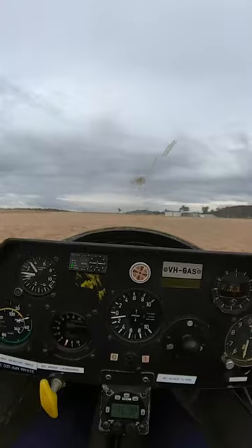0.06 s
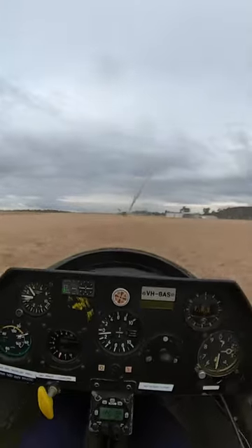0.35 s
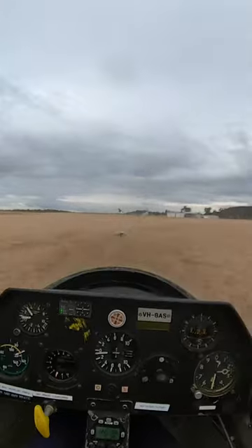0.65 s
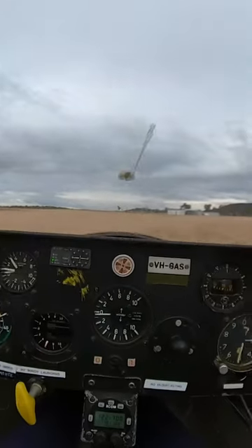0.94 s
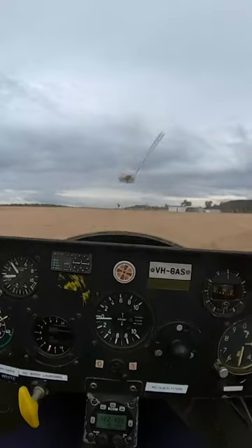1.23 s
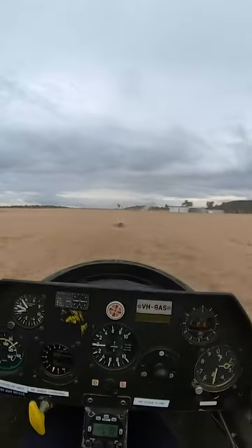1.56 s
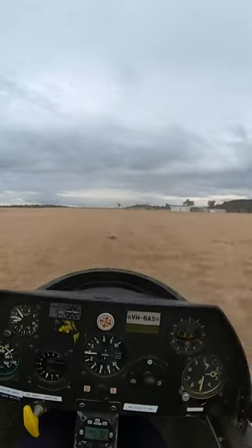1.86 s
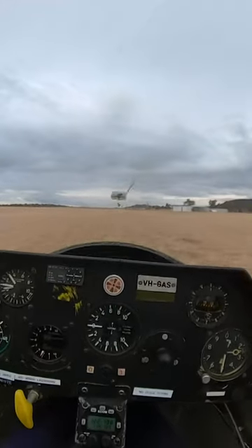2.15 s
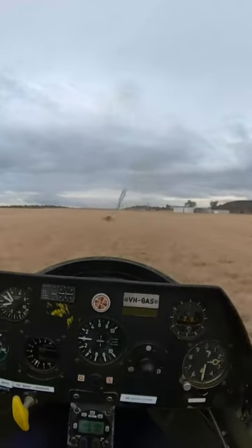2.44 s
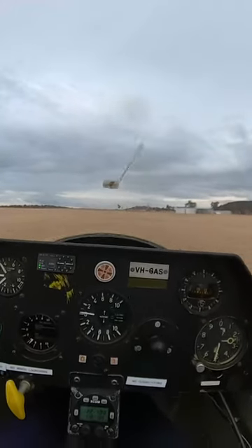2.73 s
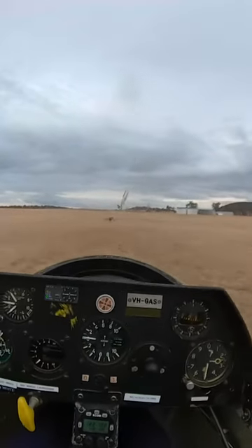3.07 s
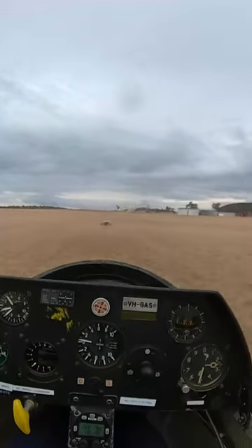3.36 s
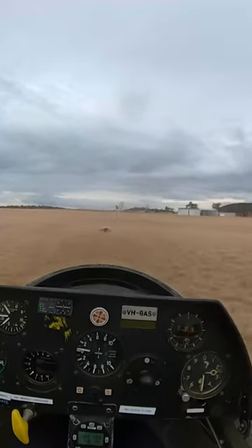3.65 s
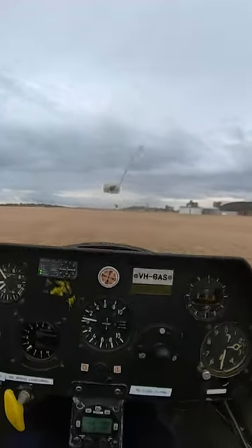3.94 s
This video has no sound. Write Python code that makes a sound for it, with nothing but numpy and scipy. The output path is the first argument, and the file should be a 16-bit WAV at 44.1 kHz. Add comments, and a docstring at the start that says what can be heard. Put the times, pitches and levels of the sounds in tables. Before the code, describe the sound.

The deep rumble of a glider's wheel on bumpy grass, heard from the pilot's seat, booms and drums through the fuselage. Scattered thuds, small rattles and thin metal chirps sound throughout, over scraping grass and a faint, even wind.

```python
"""Glider rolling over rough grass

Heard inside the closed cockpit, at speed. The wheel keeps the hollow fuselage booming,
drums on the shell and thuds over bumps; dry grass scrapes underneath.
Loose fittings rattle, knock and chirp, and air rushes past the canopy."""
import sys
import numpy as np
from scipy import signal
from scipy.fft import rfft, irfft, next_fast_len
from scipy.io import wavfile
from scipy.ndimage import uniform_filter1d, minimum_filter1d, map_coordinates

SR = 44100
rng = np.random.default_rng(int(sys.argv[2]) if len(sys.argv) > 2 else 0)


def pcm_store(signal):
    """Save signal as 16-bit PCM."""
    levels = np.round(np.clip(np.atleast_2d(signal), -1, 1) * 32767)
    wavfile.write(sys.argv[1], SR, levels.astype(np.int16).T)


N = 176400


def amp(db):
    """Decibels to gain."""
    return 10 ** (np.asarray(db) / 20)


def unit(x):
    """x at rms 1."""
    return x / np.sqrt(np.mean(x ** 2) + 1e-20)


def time_s():
    """Time of each sample."""
    return np.arange(N) / SR


def along(points, hz):
    """Interpolate (frequency [Hz], value) points on a log axis."""
    knots_hz, values = np.transpose(points)
    return np.interp(np.log(hz + 1), np.log(knots_hz + 1), values)


def curve(rows):
    """Interpolate (time [s], value) rows to one value per sample."""
    return np.interp(time_s(), *np.transpose(rows))


def wobble(rate_hz):
    """Smooth random curve through Gaussian knots."""
    knots = rng.standard_normal(int(N * rate_hz / SR) + 4)
    return map_coordinates(knots, [time_s() * rate_hz])


def filtered(x, response):
    """Apply a frequency response to x."""
    size = next_fast_len(N + SR // 2)
    return irfft(rfft(x, size) * response(np.fft.rfftfreq(size, 1 / SR)), size)[:N]


def noise(spectrum):
    """Coloured noise, rms 1."""
    return unit(filtered(rng.standard_normal(N), lambda hz: amp(along(spectrum, hz))))


def resonance(x, hz, width_hz):
    """x through two equal band-passes, each width_hz wide; rms 1."""
    return unit(filtered(x, lambda f: (1j * f * width_hz / (hz * hz - f * f + 1j * f * width_hz)) ** 2))


def steadied(x, evenness):
    """Partly flatten the envelope of x; rms 1."""
    envelope = np.abs(signal.hilbert(x))
    return unit(x / (envelope + 0.072) ** evenness)


def swells(rows, attack_s, release_s):
    """Summed attack-hold-release envelopes from (time [s], level [dB], length [s]) rows."""
    t = time_s()
    envelope = np.zeros(N)
    for start_s, db, length_s in rows:
        attack = np.clip((t - start_s) / attack_s, 0, 1)
        release = np.exp(-np.maximum(t - start_s - length_s, 0) / release_s)
        envelope += amp(db) * attack * release
    return envelope


def patchy(x, depth_db):
    """Short patches of random gain over frequency and time; rms 1."""
    bins = signal.stft(x, nperseg=256)[2]
    field = uniform_filter1d(rng.standard_normal(bins.shape), size=5, axis=0)
    field = unit(uniform_filter1d(field, size=7, axis=1))
    return unit(signal.istft(bins * amp(depth_db * field), nperseg=256)[1][:N])


def fuselage():
    """The cabin's lowest mode booms as the wheel shakes it."""
    # shaking of the fuselage (time [s], level [dB])
    shake = [(0.01, -28.5), (0.15, -15), (0.9, -20.5), (0.955, -11), (1.03, -12.5), (1.08, -30.5),
             (1.33, -10.5), (1.47, -23.5), (1.94, -17.5), (2.33, -24.5), (2.4, -15.5), (3.06, -18),
             (3.1, -26), (3.21, -26), (3.27, -2.5), (3.3, -25), (3.93, -11.5), (3.99, -41.5)]
    boom = resonance(rng.standard_normal(N), hz=64.2, width_hz=19.7)
    return amp(curve(shake)) * steadied(boom, evenness=0.39)


def bumps():
    """The airframe heaves all along; each bump adds a thud and a stronger heave."""
    # wheel impacts (time [s], thud level [dB], length [s], heave level [dB])
    impacts = [(0.119, -17.5, 0.025, -27), (0.508, -17.5, 0.026, -22), (0.882, -14.5, 0.04, -25.5),
               (0.931, -14, .026, -27), (1.664, -20, .11, -21), (3.221, -15.5, 0.017, -25),
               (3.323, -17, 0.021, -37.5), (3.424, -19, 0.046, -16)]
    # impact noise (frequency [Hz], density [dB])
    thud_spectrum = [(50, -25.5), (100, -5), (140, 4), (190, -6), (400, -18), (800, -25), (2000, -47),
                     (8000, -70.5)]
    # airframe motion (frequency [Hz], density [dB])
    heave_spectrum = [(10, -32), (19, -25), (27, 0.5), (36, 8.5), (50, 10.5), (70, -9.5), (250, -110)]
    thud_gain = swells([(s, db, hold) for s, db, hold, _ in impacts], attack_s=0.0087, release_s=0.034)
    heave_gain = swells([(s, db, hold) for s, _, hold, db in impacts], attack_s=0.0067, release_s=0.08)
    thud = steadied(noise(thud_spectrum), evenness=0.64)
    heave = steadied(noise(heave_spectrum), evenness=0.54)
    return thud_gain * thud + np.hypot(heave_gain, amp(-24)) * heave


def wheel():
    """Clods jolt the wheel: rumble, with drumming, panel groans and grass noise."""
    # ground roughness (time [s], level [dB])
    roughness = [(0.09, -57.5), (0.118, -51), (0.135, -42), (0.17, -43.5), (0.24, -44.5), (0.39, -52),
                 (0.53, -42), (0.72, -49.5), (0.76, -57), (0.8, -45.5), (0.97, -41), (1.02, -49.5),
                 (1.13, -54), (1.17, -43.5), (1.55, -48), (1.65, -40.5), (1.69, -44), (1.87, -42.5),
                 (2.03, -51), (2.05, -44), (2.4, -44), (3.17, -47.5), (3.235, -41), (3.28, -43.5),
                 (3.41, -46.5), (3.45, -35.5), (3.48, -45.5), (3.58, -47.5), (3.62, -45), (3.86, -41),
                 (3.97, -45)]
    # wheel rumble (time [s], level [dB])
    rumble_levels = [(0, -28), (.18, -27), (.35, -32), (.55, -22.5), (.68, -32), (1.0, -21.5),
                     (1.13, -26.5), (1.58, -26), (1.76, -21.5), (1.92, -24.5), (2.13, -21), (2.6, -25.5),
                     (3.3, -29.5), (3.95, -24)]
    # wheel rumble (frequency [Hz], density [dB])
    rumble_spectrum = [(60, -38.5), (85, -8), (108, -4.5), (137, 2), (175, -8), (300, -14.5), (500, -27.5),
                       (2000, -100)]
    ground_db = curve(roughness)
    jolts = unit(amp(1.07 * wobble(45) + 1.37 * wobble(170)))
    rumble = amp(curve(rumble_levels)) * jolts * noise(rumble_spectrum)
    return rumble + drumming(ground_db, jolts) + panel() + grass(ground_db, jolts)


def drumming(ground_db, jolts):
    """Jolts drum on the shell and ring its modes, louder on rougher ground."""
    # shell modes (frequency [Hz], half width [Hz], level [dB])
    modes = [(263, 27, -10.5), (366.4, 40, -6.5), (520.3, 14, -6.5), (553, 21, -14.5), (762, 49, -10.5),
             (863.2, 15, -13.5), (1177, 40, -25.5)]
    # broadband drumming (frequency [Hz], density [dB])
    drum_spectrum = [(80, -9), (310, -1), (830, -2.5), (1000, -10.5), (1400, -14.5), (1900, -20),
                     (3000, -38.5), (9000, -65)]
    shell = sum(amp(db) * resonance(jolts * rng.standard_normal(N), hz, 2 * half_width_hz)
                for hz, half_width_hz, db in modes)
    drum = jolts * noise(drum_spectrum)
    return amp(ground_db) * (amp(10) * drum + amp(11) * shell)


def panel():
    """The strongest panel groans in short rough bursts."""
    # panel groans (time [s], level [dB], length [s])
    bursts = [(.578, -32.5, 0.018), (.942, -24.5, 0.024), (1.635, -34.5, 0.12), (1.845, -36, 0.065),
              (2.228, -28, 0.038), (2.298, -26.5, 0.042), (3.79, -31.5, 0.08)]
    pitch_hz = 527.6 + 9 * wobble(60)
    tone = np.sin(2 * np.pi * np.cumsum(pitch_hz) / SR)
    groan = unit(amp(2 * wobble(200)) * tone)
    return swells(bursts, attack_s=0.015, release_s=0.007) * groan


def grass(ground_db, jolts):
    """Stalks catch and slip on the belly amid tiny rattles; tall tufts hiss brighter."""
    # tall tufts brushing the belly (time [s], level [dB], length [s])
    tufts = [(.215, -48, 0.05), (.52, -54, 0.15), (.91, -42.5, 0.11), (2.58, -47.5, 0.11),
             (3.43, -45, 0.11), (3.84, -48.5, 0.043)]
    # scraping stalks (frequency [Hz], density [dB])
    scrape_spectrum = [(300, -11), (1100, 8.5), (1900, 5), (3000, 4.5), (4700, -3), (6200, -6.5),
                       (9000, -11.5)]
    patter = rattles(rate_hz=340, decay_s=0.00076)
    grain = unit(amp(0.47 * wobble(500) + 2.1 * wobble(30)))
    mean_db = ground_db.mean()
    contact = amp(mean_db + 0.97 * (ground_db - mean_db))
    brushing = swells(tufts, attack_s=0.0052, release_s=0.0046)
    hiss = resonance(rng.standard_normal(N), hz=6250, width_hz=9900)
    scrape = jolts * patchy(noise(scrape_spectrum), depth_db=2.0)
    return grain * (brushing * hiss + contact * (amp(1) * scrape + amp(-14) * patter))


def rattles(rate_hz, decay_s):
    """Tiny damped pings of random time, pitch and size; rms 1."""
    t = np.arange(SR // 50) / SR
    patter = np.zeros(N + len(t))
    for when, pitch, size in rng.random((int(rate_hz * N / SR), 3)):
        hz = 1300 + 6000 * pitch
        ping = np.sin(2 * np.pi * hz * t) * np.exp(-t / decay_s)
        patter[int(when * N):][:len(t)] += amp(19 * size ** 2) * ping
    return unit(patter[:N])


def knocks():
    """Loose fittings knock: short, heavily damped bursts."""
    # fitting strikes (time [s], level [dB], centre frequency [Hz])
    strikes = [(0.136, -39.5, 3270), (0.996, -44.5, 6170), (1.637, -37, 2600), (1.855, -39, 3780),
               (2.057, -42.5, 4980), (2.387, -40, 2226), (3.237, -39.5, 3260), (3.708, -42.5, 6600)]
    sound = np.zeros(N)
    for start_s, db, hz in strikes:
        envelope = swells([(start_s, db, 0.003)], attack_s=0.0005, release_s=0.012)
        sound += envelope * resonance(rng.standard_normal(N), hz, width_hz=1.5 * hz)
    return sound


def chirps():
    """One small metal fitting squeaks and chatters as it is shaken."""
    # squeaks of the fitting (time [s], level [dB], length [s], pitch [Hz])
    squeaks = [(0.094, -50, .009, 4920), (0.14, -47, 0.013, 4946), (.235, -55, .02, 4960),
               (.303, -50.5, 0.032, 4890), (.428, -48, .013, 4900), (0.528, -46.5, 0.022, 5173),
               (0.585, -49, .018, 5060), (0.666, -58, .025, 5150), (0.798, -48.5, 0.014, 4880),
               (.955, -48, 0.024, 4930), (1.319, -54, .045, 4990), (1.878, -46.5, .026, 4940),
               (2.488, -49, .046, 4900), (2.558, -50.5, .075, 4850), (2.697, -44.5, .016, 4890),
               (2.758, -48, 0.01, 5110), (2.896, -53, 0.036, 4890), (3.243, -51, .012, 4900),
               (3.62, -51, .05, 4840), (3.827, -47, 0.047, 4820)]
    pitch_hz = curve([(s, hz) for s, _, _, hz in squeaks]) + 90 * wobble(350)
    rasp = unit(amp(3 * wobble(420) + 1.5 * wobble(70)))
    squeak = amp(-1) * unit(np.sin(2 * np.pi * np.cumsum(pitch_hz) / SR))
    chatter = amp(-7.5) * resonance(rng.standard_normal(N), hz=5050, width_hz=800)
    shaken = swells([row[:3] for row in squeaks], attack_s=0.0043, release_s=0.012)
    return shaken * rasp * (squeak + chatter)


def airflow():
    """Air rushes almost evenly past the canopy."""
    # air noise (frequency [Hz], density [dB])
    air_spectrum = [(40, -7.5), (800, -21), (1500, -19.5), (7000, -56)]
    return amp(-52.5 + wobble(1.3)) * noise(air_spectrum)


def cockpit(x, wet_db, t60_s):
    """Canopy and walls add close reflections above 900 Hz."""
    t = np.arange(SR // 10) / SR
    tail = rng.standard_normal(len(t)) * amp(-60 * t / t60_s)
    wet = signal.fftconvolve(x, tail / np.linalg.norm(tail))[:N]
    return x + amp(wet_db) * filtered(wet, lambda hz: hz > 900)


def scene():
    """Mono mix at the pilot's seat."""
    airframe = fuselage() + bumps()
    rolling = cockpit(wheel() + knocks() + chirps(), wet_db=-11, t60_s=0.1)
    return (airframe + rolling + airflow())[None]


def limiter(x, ceiling_db):
    """The gain dips smoothly around peaks above the ceiling."""
    needed_gain = np.minimum(1, amp(ceiling_db) / (np.abs(x) + 1e-9))
    return x * uniform_filter1d(minimum_filter1d(needed_gain, size=900), size=900)


def record(dry):
    """Peaks are held down and the top treble is cut."""
    # microphone response (frequency [Hz], gain [dB])
    response = [(22, 1.5), (6800, -4), (7500, -11), (8100, -15), (9300, -29)]
    cutoff_hz = 9300
    held = limiter(dry[0], ceiling_db=-6.5)
    return filtered(held, lambda hz: amp(along(response, hz)) * (hz < cutoff_hz))[None]


dry = scene()
out = record(dry)
pcm_store(out)
```